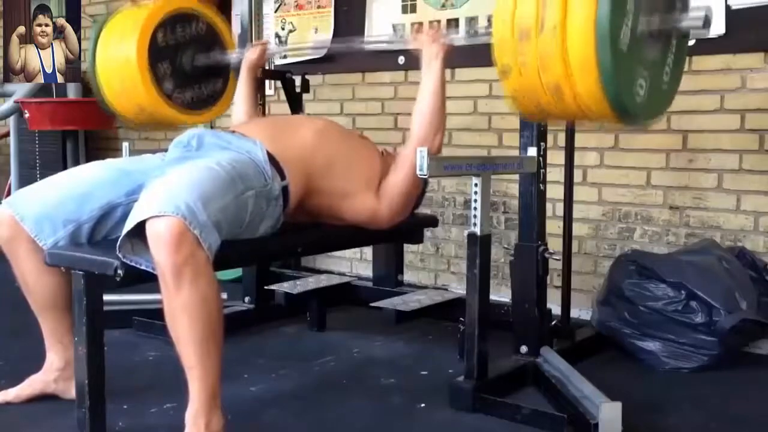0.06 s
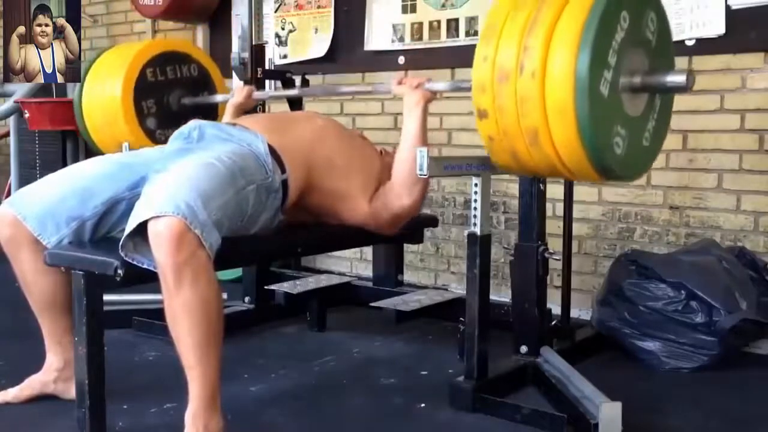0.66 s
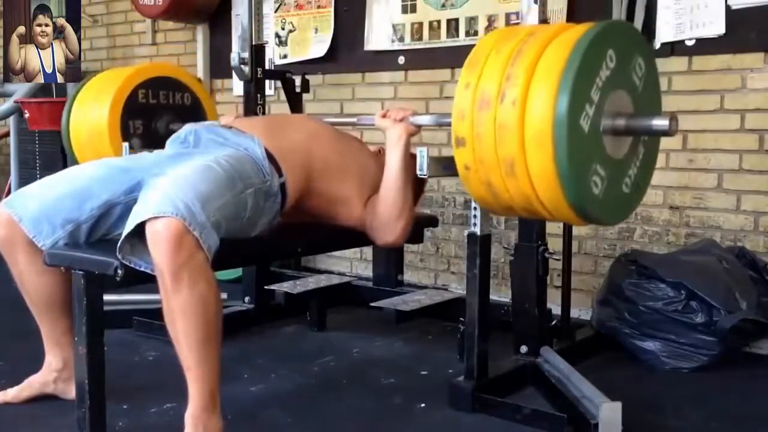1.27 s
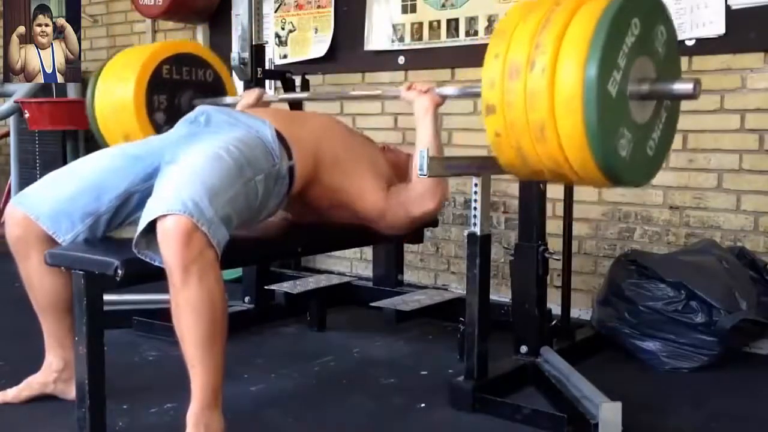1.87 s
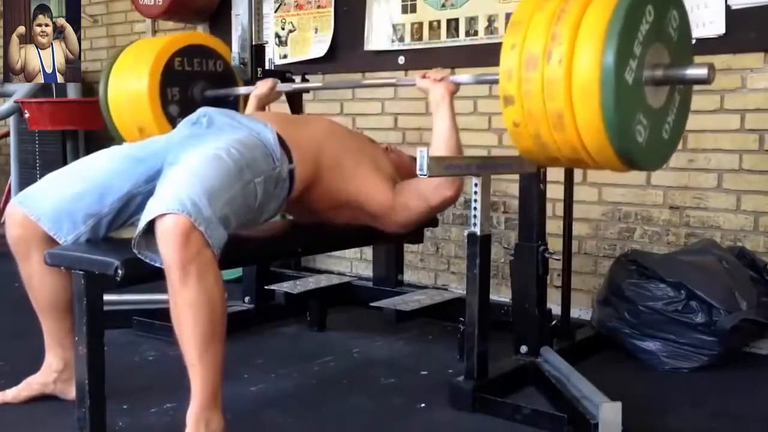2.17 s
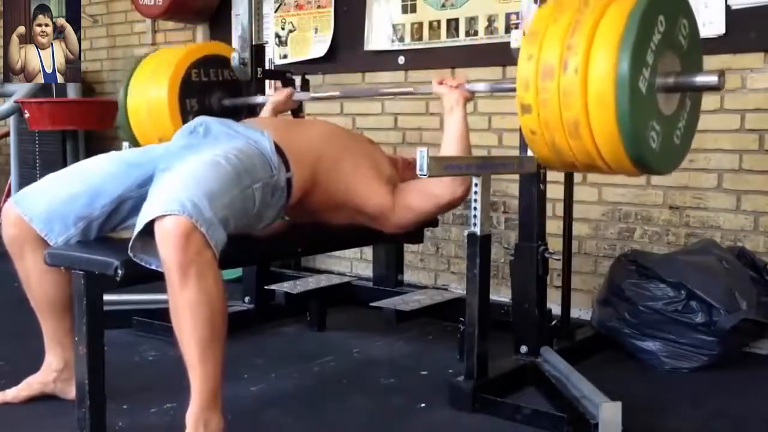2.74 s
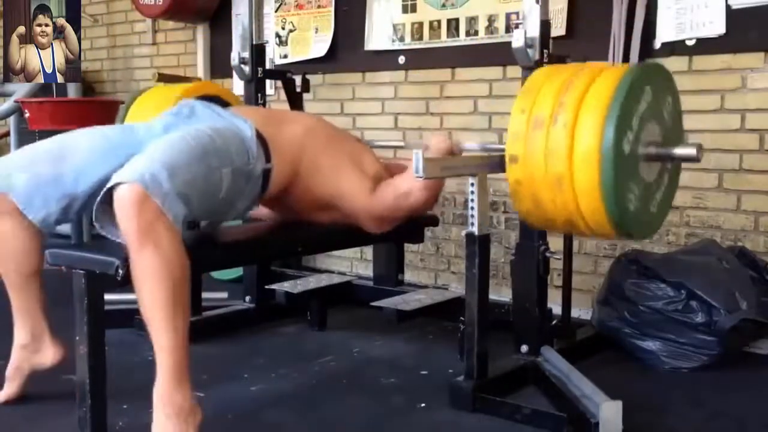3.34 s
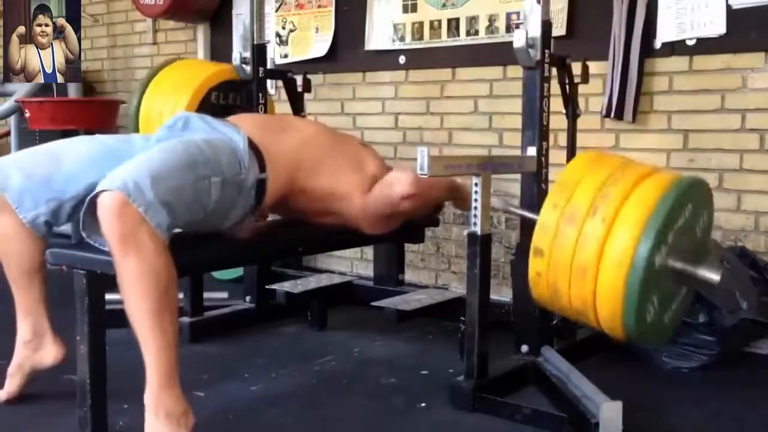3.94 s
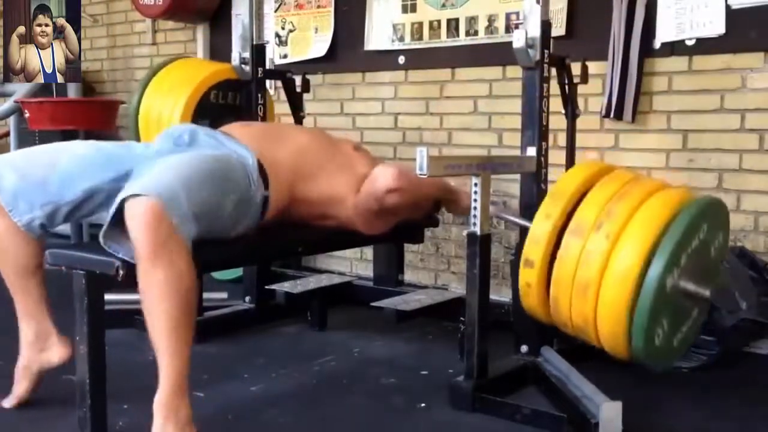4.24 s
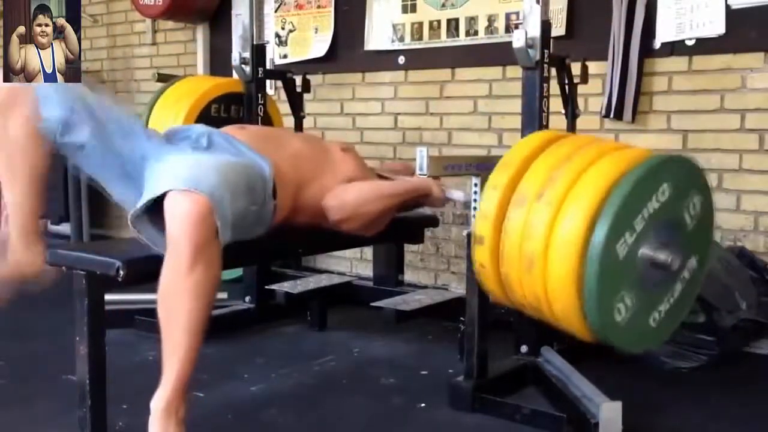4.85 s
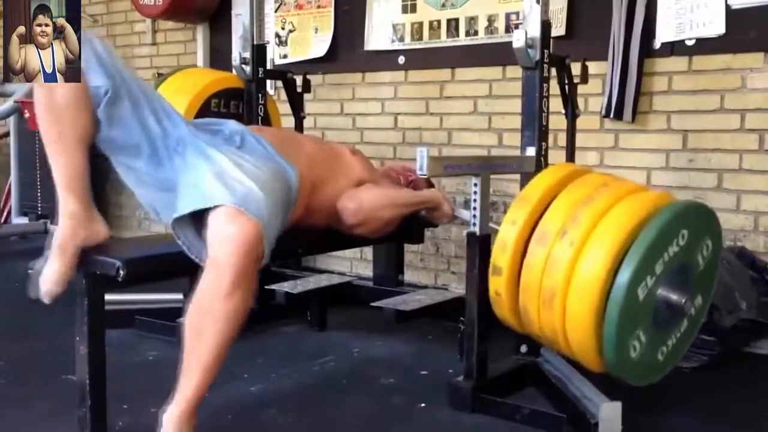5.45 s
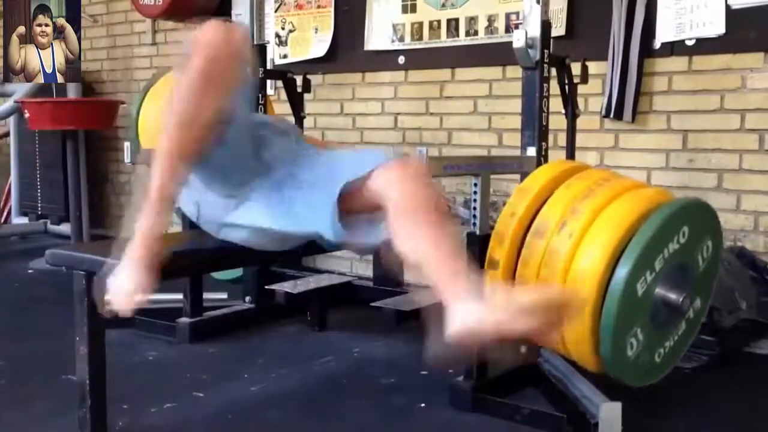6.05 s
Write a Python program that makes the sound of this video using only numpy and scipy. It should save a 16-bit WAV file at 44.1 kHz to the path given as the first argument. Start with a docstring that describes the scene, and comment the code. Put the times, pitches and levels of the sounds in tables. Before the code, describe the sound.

A loaded barbell crashes and bounces on a steel rack with rattling plates, then scrapes along the frame and clangs against it.

```python
"""A low hum, the rustle of a lifter on a bench pad and faint birds outside a small brick gym.
About 3 s in, close to the microphone, a barbell with rubber plates drops onto the steel safety arms,
bounces and thumps down through the frame to the floor mat. Loose plates chatter after each bounce.
The knurled shaft then scrapes along an arm, knocks the upright and shifts against the frame.
The walls ring briefly behind every blow."""
import sys
import numpy as np
from scipy import signal
from scipy.fft import rfft, irfft
from scipy.io import wavfile

SR = 44100
rng = np.random.default_rng(int(sys.argv[2]) if len(sys.argv) > 2 else 0)


def wrap_up_sound(samples):
    """Save the sound to the file named by the first command line argument, as 16-bit audio."""
    columns = np.atleast_2d(samples).T
    # keep every value between -1 and 1, then stretch to whole-number steps
    tamed = np.clip(columns, -1, 1)
    steps = np.round(tamed * 32767).astype(np.int16)
    wavfile.write(sys.argv[1], SR, steps)


N = 273861
TAIL = 27000  # samples allowed for a blow or an echo to die away
T = np.arange(N) / SR
TAIL_T = T[:TAIL]

# reverberation of the gym: f/Hz, t60/s
ROOM_T60 = [(80, 0.69), (250, 0.63), (1000, 0.52), (3000, 0.43), (6000, 0.37), (12000, 0.25)]
# spectrum of the room tone: f/Hz, relative level/dB
ROOM_TONE = [(15, -40), (25, -6), (59, -3.5), (103, -6), (172, -3.5), (202, -1.5), (237, -1.5), (309, -8.5),
             (404, -6.5), (769, -11.5), (3350, -20.5), (7280, -25), (10600, -45), (15000, -60.5)]
# course of a hum near the room's low resonance: t/s, relative level/dB
HUM = [(0.0, -63.5), (0.69, -61.5), (0.98, -71), (1.73, -71), (2.44, -66), (2.85, -69)]
# notes of the nearest bird outside: t/s, length/s, f/Hz, level/dB
BIRD_NOTES = [(2.27, .06, 5400, -80), (2.355, 0.084, 4200, -66.5), (2.48, .07, 5420, -74.5),
              (2.605, .08, 3310, -62.5), (2.78, 0.11, 3553, -65.5)]
# the lifter moving on the pad: t/s, length/s, level/dB
LIFTER_MOVES = [(0, 0.69, -68), (1.935, 0.73, -69), (4.253, 0.6, -56.5), (5.35, 0.58, -63.5),
                (5.834, 0.56, -64.5)]
# spectrum of that rubbing: f/Hz, relative level/dB
RUSTLE_SPECTRUM = [(60, -9), (150, -2.5), (300, 2.5), (550, -4.5), (1000, -12), (2500, -19), (5000, -18),
                   (9000, -37), (12000, -61)]
# small shifts of the loaded bar and bench: t/s, level/dB
SHIFTS = [(.135, -64), (1.37, -61.5), (1.715, -64.5), (5.52, -59), (5.623, -69), (6.02, -64)]
# the bench pad giving under load: t/s, level/dB, f/Hz
PAD_THUMPS = [(.295, -55, 207.7), (1.21, -62.5, 230), (1.715, -60, 235), (2.0, -60, 192), (4.72, -40, 243),
              (6.02, -58.5, 478)]
# the load thumping through the frame onto the floor mat: t/s, level/dB, f/Hz
FLOOR_THUMPS = [(3.243, -34, 100), (3.781, -35.5, 85.3), (4.753, -38.5, 125.6), (5.055, -35, 127),
                (5.18, -41, 110)]
# rubber plates bumping each other: t/s, level/dB, f/Hz
PLATE_BUMPS = [(3.363, -26.5, 292), (3.47, -29, 239), (3.617, -24, 279), (3.649, -30, 291),
               (3.766, -27.5, 300), (3.841, -31.5, 282), (4.349, -44, 410), (6.157, -40.5, 278)]
# rubber groaning in the slide: t/s, length/s, f/Hz, level/dB
GROANS = [(4.84, .056, 360, -32), (4.898, .036, 293.6, -27.5)]
# steel squealing in the slide: t/s, length/s, f/Hz, level/dB
SQUEALS = [(4.912, 0.047, 2340, -31), (4.925, 0.0534, 2815, -34), (4.955, 0.068, 1977, -31.5)]
# resonances that the knurling rasps on: f/Hz, width/Hz, relative level/dB
RASP_MODES = [(855, 490, 7.5), (1350, 100, -10), (1910, 430, 6), (2460, 82, 6), (2620, 230, 2),
              (3412, 53, 2), (4730, 120, -4), (7200, 1040, -6.5)]
# spectrum of clattering plates and frame: f/Hz, relative level/dB
CLATTER = [(25, -22), (50, -13), (80, -5.5), (130, -1), (300, -0.5), (700, -0.5), (1200, -1), (2000, -1),
           (3800, 0), (5200, -9), (7500, -15), (9000, -24.5), (10500, -50), (15000, -43)]
# the bar against the frame as the lifter rolls off: t/s, level/dB, chatter length/s
FRAME_KNOCKS = [(6.09, -44.5, 0.039), (6.128, -33.5, .023), (6.156, -32, 0.027)]
# modes of the frame: f/Hz, relative level/dB
FRAME_MODES = [(1600, 3), (2070, -11.5), (2510, 1.5), (2890, 9), (3130, -1), (4230, -9), (6520, -6)]
# steel hubs clanking on the sleeves: t/s, level/dB, chatter length/s
HUB_CLANKS = [(2.927, -42.5, .012), (4.086, -27, 0.0097), (4.122, -32.5, 0.033), (4.26, -42.5, 0.024)]
# modes of the hubs: f/Hz, relative level/dB
HUB_MODES = [(1873, -13), (2643, 2), (3160, 2), (3311, 1), (3569, -4), (3898, -6.5)]
# the shaft knocking the upright: t/s, level/dB, chatter length/s
BAR_KNOCKS = [(4.618, -50.5, 0.019), (4.655, -39.5, 0.061), (4.753, -34, 0.025), (5.013, -27.5, 0.032),
              (5.038, -22.5, 0.014), (5.171, -21.5, 0.029)]
# modes of the bar: f/Hz, relative level/dB
BAR_MODES = [(1082, -6), (1211, 0), (1518, -0.5), (1895, -10), (2353, 3), (2977, -21), (3321, -6),
             (4050, -6), (4506, -19), (4829, -12)]
# the bar bouncing on the safety arms: t/s, level/dB, chatter length/s
RACK_BLOWS = [(2.937, -15, 0.013), (2.99, -13.5, 0.018), (3.026, -13.5, .042), (3.197, -15.5, 0.022),
              (3.222, -14, 0.018), (3.345, -20, 0.14), (3.43, -15, 0.026), (3.58, -18.5, .036),
              (3.699, -21, 0.013), (3.833, -26.5, 0.028), (4.02, -36, 0.02)]
# modes of the steel rack: f/Hz, relative level/dB
RACK_MODES = [(333, -3), (624, 9.5), (843, 2.5), (1047, -2), (1219, -6), (1596, 0.5), (1670, 4), (1745, 4),
              (1879, 9), (2229, 3.5), (2340, -1.5), (2603, -6.5), (2730, -8), (2804, -8), (3021, -13),
              (3562, -5), (3745, -6), (3995, -7)]

SLIDE_START_S, SLIDE_END_S = 4.74, 5.02


def undb(db):
    """Decibels to gain."""
    return 10 ** (np.asarray(db) / 20)


def unit(x):
    """Scale to an energy of one."""
    return x / np.sqrt(np.sum(x ** 2))


def level(x, db):
    """Scale to an rms level."""
    return unit(x) * np.sqrt(len(x)) * undb(db)


def blow(x, db):
    """Scale a short sound to the level it has when spread over 50 ms."""
    return unit(x) * np.sqrt(SR / 20) * undb(db)


def add(out, s, x):
    """Mix x in at time s."""
    i = int(np.clip(s * SR, 0, N - 1))
    out[i:i + len(x)] += x[:N - i]


def band(x, hz, kind, order=2):
    """Butterworth filter."""
    return signal.sosfilt(signal.butter(order, hz, kind, fs=SR, output="sos"), x)


def through(x, response):
    """Play x through an impulse response."""
    return signal.fftconvolve(x, response)[:len(x)]


def fade(t60):
    """Exponential decay, 60 dB in t60 seconds."""
    return np.exp(-np.log(1000) * TAIL_T / t60)


def wander(hz, size):
    """Smooth random motion with a spread of one."""
    return level(band(rng.standard_normal(size + SR), hz, "low"), 0)[SR:]


def hump(hz, centre_hz, octaves):
    """Bell curve on a log-frequency axis."""
    return np.exp(-(np.log2((hz + 1) / centre_hz) / octaves) ** 2 / 2)


def colour(points, thump_db=0, clang_db=0, treble_db=0, size=2048):
    """Impulse response of a spectrum; rubber adds thump, bare steel adds clang and treble."""
    hz = np.fft.rfftfreq(size, 1 / SR)
    point_hz, point_db = np.transpose(points)
    db = np.interp(np.log(hz + 1), np.log(point_hz), point_db)
    db += thump_db * hump(hz, 175, .9) + clang_db * hump(hz, 3500, .23) + treble_db * hump(hz, 8500, .97)
    # minimum phase keeps the attack sharp
    cepstrum = irfft(np.log(undb(db)))
    cepstrum[1:size // 2] *= 2
    cepstrum[size // 2 + 1:] = 0
    return unit(irfft(np.exp(rfft(cepstrum))))


def room(wet_db, early_db=-3, early_t60=.044):
    """Path to the microphone: direct sound, early reflections, a tail that dies sooner in the treble."""
    noise = rfft(rng.standard_normal(TAIL))
    centres, t60s = np.transpose(ROOM_T60)
    log_hz = np.log(np.fft.rfftfreq(TAIL, 1 / SR) + 1)
    bands = [irfft(noise * np.interp(log_hz, np.log(centres), share)) for share in np.eye(len(centres))]
    tail = sum(part * fade(t60) for part, t60 in zip(bands, t60s)) * (1 - fade(.018))
    early = unit(rng.standard_normal(TAIL) * fade(early_t60))
    response = undb(wet_db) * (unit(tail) + undb(early_db) * early)
    response[0] += 1
    return unit(response)


def room_tone(hiss_db=-64, hum_trim_db=-2.5):
    """Quiet air all around the microphone, with a wavering low hum."""
    hiss = level(through(rng.standard_normal(N), colour(ROOM_TONE)), hiss_db)
    hiss *= undb(.36 * wander(3.7, N))
    hum = level(band(rng.standard_normal(N), [164, 180], "band"), hum_trim_db)
    return hiss + hum * undb(np.interp(T, *np.transpose(HUM)))


def glides(table, start_ratio, end_ratio, rough, jitter_hz, flutter_db):
    """Unsteady tones that bend into and out of their pitch, swelling and fading."""
    out = np.zeros(N)
    for s, length, pitch, db in table:
        u = np.linspace(0, 1, int(length * SR))
        bend = np.polyval(np.polyfit([0, .5, 1], [start_ratio, 1, end_ratio], 2), u)
        hz = pitch * bend * (1 + rough * wander(jitter_hz, SR)[:len(u)])
        swell = np.sqrt(u * (1 - u)) * undb(flutter_db * wander(70, SR)[:len(u)])
        add(out, s, level(np.sin(2 * np.pi * np.cumsum(hz) / SR) * swell, db))
    return out


def birds(far_count=8, far_span_s=1.7, far_hz=3700, far_db=-77):
    """Birds outside, heard from indoors: a distant twitter, then a nearer one's swooping notes."""
    near = glides(BIRD_NOTES, start_ratio=1.15, end_ratio=1.06, rough=.038, jitter_hz=500, flutter_db=2.5)
    twitter = []
    for k, (when, pitch, loud) in enumerate(rng.uniform(-.69, 1, (far_count, 3))):
        s = (k + .5 + when / 2) * far_span_s / far_count
        twitter.append((s, .16, far_hz * (1 + .17 * pitch), far_db + 3 * loud))
    far = glides(twitter, start_ratio=1, end_ratio=1.02, rough=.072, jitter_hz=512, flutter_db=2.5)
    return through(near + far, room(wet_db=.5))


def rustle(flicker_db=3):
    """Close and dry: skin and denim rub on the pad in uneven strokes that swell and fade."""
    moves = sum(undb(db) * np.sqrt(np.clip(1 - (2 * (T - s) / length - 1) ** 2, 0, 1))
                for s, length, db in LIFTER_MOVES)
    friction = level(through(rng.standard_normal(N), colour(RUSTLE_SPECTRUM)), 0)
    return friction * moves * undb(flicker_db * wander(8, N))


def chatter(length, first, hits_per_s=1100, spread_db=5):
    """A contact of strength `first`, then a dying hail of small collisions between loose parts."""
    hail = (rng.random(TAIL) < hits_per_s / SR) * rng.choice([-1, 1], TAIL)
    hail = hail * undb(spread_db * rng.standard_normal(TAIL))
    force = unit(hail * np.exp(-(TAIL_T / length) ** 2 / 2) + 1e-9 * (TAIL_T == 0))
    force[0] += first
    return unit(force)


def creaks(hz=1300):
    """Brief midrange creaks at the bench as the load settles."""
    out = np.zeros(N)
    for s, db in SHIFTS:
        creak = through(chatter(.015, first=.1), colour(CLATTER))
        add(out, s, blow(band(creak, [hz / 2.3, hz * 1.13], "band", order=1), db))
    return out


def graze(s=2.888, db=-58.5):
    """One light, bright tick as the shaft grazes the arm just before it lands."""
    out = np.zeros(N)
    tick = band(rng.standard_normal(TAIL) * fade(.03), [3100, 6600], "band", order=5)
    add(out, s, blow(tick, db))
    return out


def thuds(table, t60, rumble_db):
    """Soft contacts on rubber or padding: a damped low resonance with rumble around it."""
    out = np.zeros(N)
    for s, db, hz in table:
        rumble = level(band(rng.standard_normal(TAIL), [hz / 1.38, hz * 1.52], "band"), rumble_db)
        body = np.sin(2 * np.pi * hz * TAIL_T) + rumble
        add(out, s, blow(body * fade(t60) * (1 - fade(.02)), db))
    return band(out, 1100, "low")


def groans():
    """Rubber groans upward in pitch during the slide."""
    return glides(GROANS, start_ratio=.88, end_ratio=1.14, rough=.07, jitter_hz=300, flutter_db=2)


def squeals():
    """Sliding steel squeals, sagging a little in pitch."""
    return glides(SQUEALS, start_ratio=1.05, end_ratio=.99, rough=.038, jitter_hz=300, flutter_db=1)


def slide_db(t, start_db=-34.5, growth_db_per_s=30.5, edge_db_per_s=453):
    """Level of the slide: it sets in quickly, grows as the bar gathers speed and stops short."""
    inside = np.clip(t, SLIDE_START_S, SLIDE_END_S)
    return start_db + growth_db_per_s * (inside - SLIDE_START_S) - edge_db_per_s * np.abs(t - inside)


def rasp(trim_db=-2, slips_per_s=600, uneven_db=2.5):
    """Knurling grinds over the steel edge: tiny uneven slips drive a few resonances."""
    slips = (rng.random(N) < slips_per_s / SR) * rng.standard_normal(N)
    body = np.zeros(TAIL)
    for k, (hz, width, db) in enumerate(RASP_MODES):
        mode = np.exp(-np.pi * width * TAIL_T) * np.sin(2 * np.pi * hz * TAIL_T)
        body += (-1) ** k * undb(db) * unit(mode)
    return level(through(slips, body), trim_db) * undb(slide_db(T) + uneven_db * wander(35, N))


def jerks(trim_db=-4, count=9):
    """The sliding shaft catches and slips: a run of short jolts, as rows of blows."""
    starts = np.linspace(SLIDE_START_S, SLIDE_END_S, count) + .004 * rng.standard_normal(count)
    return [(s, slide_db(s) + trim_db, .028) for s in starts]


def rattles(table, trim_db, lag_s=.078, length_s=.06):
    """Loose plates swing back after each blow and rattle more softly, as rows of blows."""
    return [(s + lag_s, db + trim_db, length_s) for s, db, _ in table]


def ring(modes, t60, scatter_db=3):
    """Steel rings freely; each point of contact weights the modes differently."""
    tones = np.zeros(TAIL)
    for hz, db in modes:
        gain = undb(db + scatter_db * rng.standard_normal())
        tones += gain * np.sin(2 * np.pi * (hz * TAIL_T + rng.random()))
    return unit(tones * fade(t60) * (1 - fade(.006)))  # the ring swells in over the first few milliseconds


def steel(table, modes, ring_db, ring_t60, first, wet_db, thump_db, clang_db, treble_db,
          thump_per_db=0, dulling_per_db=.22):
    """Blows on loaded steel: damped plates clatter, a few modes ring on; softer blows are duller."""
    out = np.zeros(N)
    hardest_db = max(db for _, db, _ in table)
    for s, db, length in table:
        softer_db = hardest_db - db
        tone = colour(CLATTER, thump_db + thump_per_db * softer_db, clang_db,
                      treble_db - dulling_per_db * softer_db)
        # the bar keeps moving, so every blow reaches the microphone along new paths
        clatter = through(room(wet_db), tone)
        force = chatter(length, first)
        ringing = undb(ring_db) * ring(modes, ring_t60)
        add(out, s, blow(through(force, clatter + ringing), db))
    return out


def frame_knocks():
    """The bar shifts against the frame and sets it ringing."""
    return steel(FRAME_KNOCKS, FRAME_MODES, ring_db=-4, ring_t60=.3, first=.39, wet_db=8.5,
                 thump_db=-2, clang_db=-.5, treble_db=0)


def hub_clanks():
    """Hubs strike the sleeves: short, bright clanks with plenty of room on them."""
    blows = HUB_CLANKS + rattles(HUB_CLANKS, trim_db=-13.5)
    return steel(blows, HUB_MODES, ring_db=-9, ring_t60=.098, first=.36, wet_db=9,
                 thump_db=-6.5, clang_db=2.7, treble_db=-2, thump_per_db=.7)


def bar_knocks():
    """The shaft rings as it knocks the upright and jerks along the arm; drier, so it sounds closer."""
    blows = BAR_KNOCKS + rattles(BAR_KNOCKS, trim_db=-16.5) + jerks()
    return steel(blows, BAR_MODES, ring_db=-6, ring_t60=.34, first=.1, wet_db=0,
                 thump_db=-6, clang_db=-4, treble_db=1)


def plate_rattle():
    """Loose plates shake the rack again just after each bounce."""
    blows = rattles(RACK_BLOWS, trim_db=-8.5)
    return steel(blows, RACK_MODES, ring_db=-8, ring_t60=.27, first=.15, wet_db=6,
                 thump_db=-4, clang_db=-2, treble_db=-4.5, thump_per_db=.6)


def barbell_drop():
    """In the foreground, the loaded bar crashes onto the safety arms and bounces."""
    return steel(RACK_BLOWS, RACK_MODES, ring_db=-9, ring_t60=.23, first=.26, wet_db=5.5,
                 thump_db=-6, clang_db=0, treble_db=1, thump_per_db=.85)


def scene():
    """The gym from one microphone near the bench."""
    metal = barbell_drop() + plate_rattle() + bar_knocks() + hub_clanks() + frame_knocks()
    bumps = thuds(PLATE_BUMPS, t60=.1, rumble_db=-1)
    bumps += thuds(FLOOR_THUMPS, t60=.34, rumble_db=-2.5)
    bumps += thuds(PAD_THUMPS, t60=.17, rumble_db=5.5)
    friction = groans() + squeals() + graze() + creaks() + rasp()
    contacts = through(bumps + friction, room(wet_db=-4))
    return (metal + contacts + birds() + rustle() + room_tone())[None]


def record(dry, top_hz=15400):
    """The phone's microphone rounds the highest peaks and cuts the top."""
    rounded = np.tanh(.85 * dry) / .76
    return signal.sosfilt(signal.ellip(10, .2, 80, top_hz, fs=SR, output="sos"), rounded)


dry = scene()
out = record(dry)
wrap_up_sound(out)
```